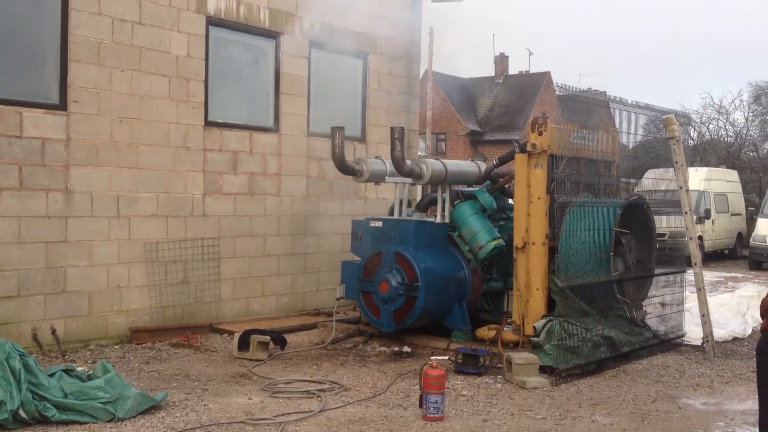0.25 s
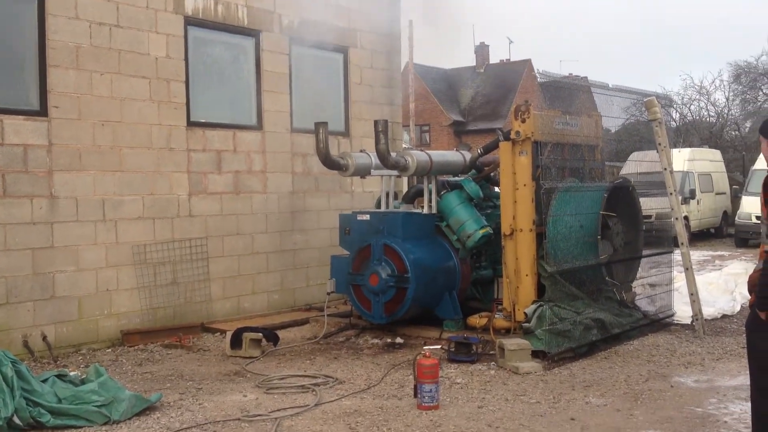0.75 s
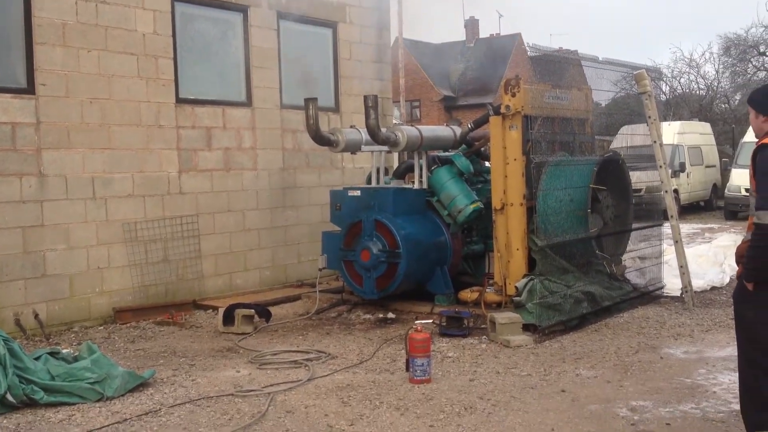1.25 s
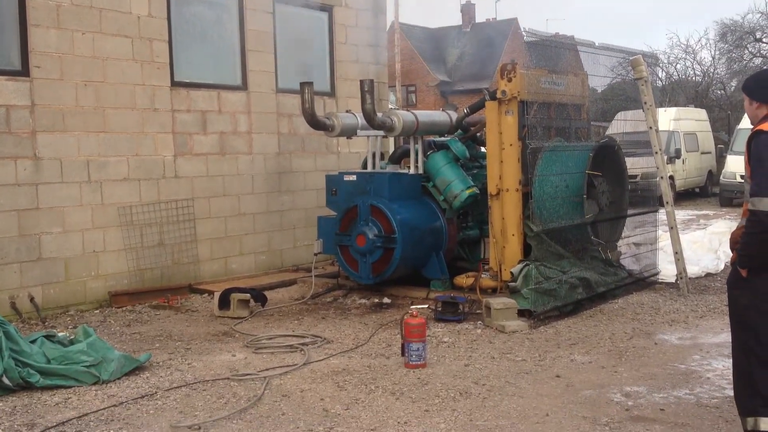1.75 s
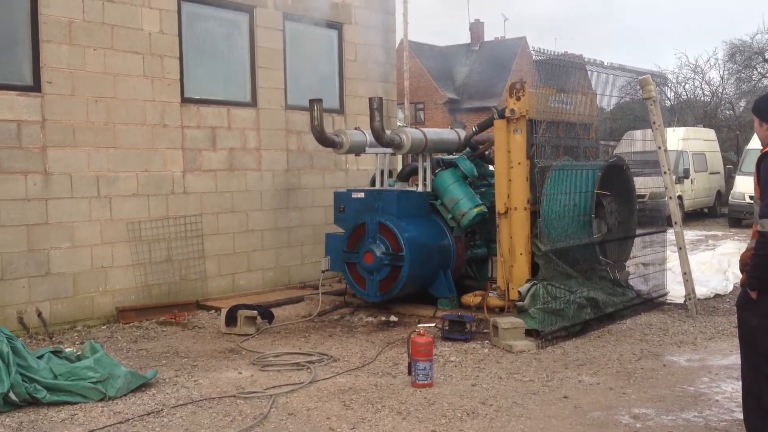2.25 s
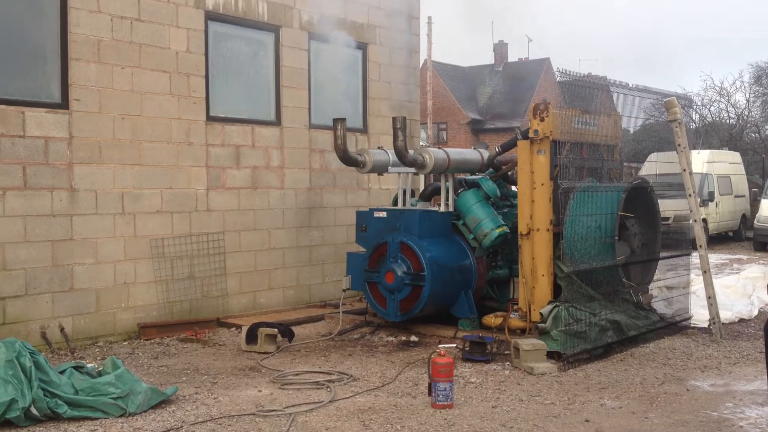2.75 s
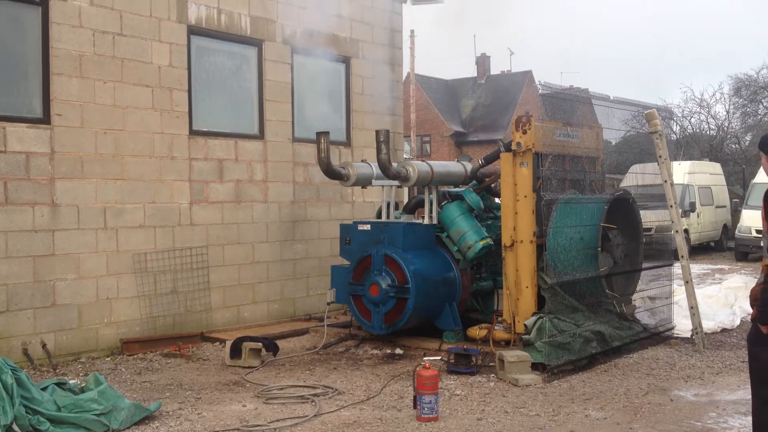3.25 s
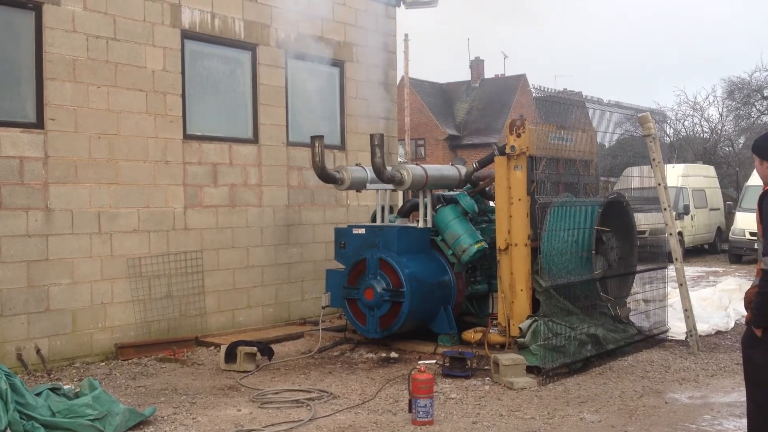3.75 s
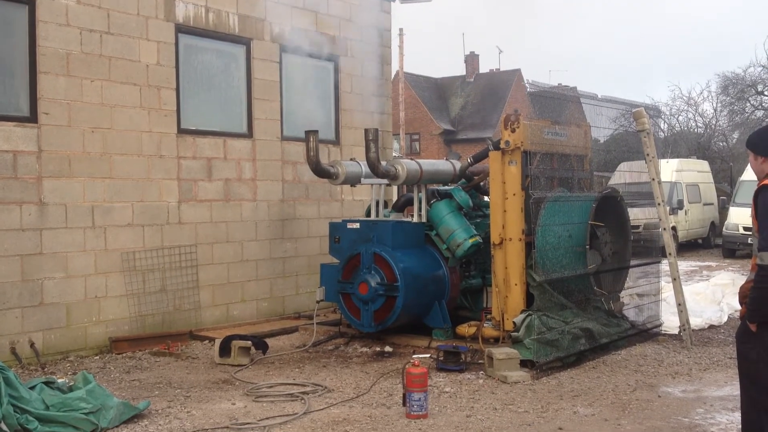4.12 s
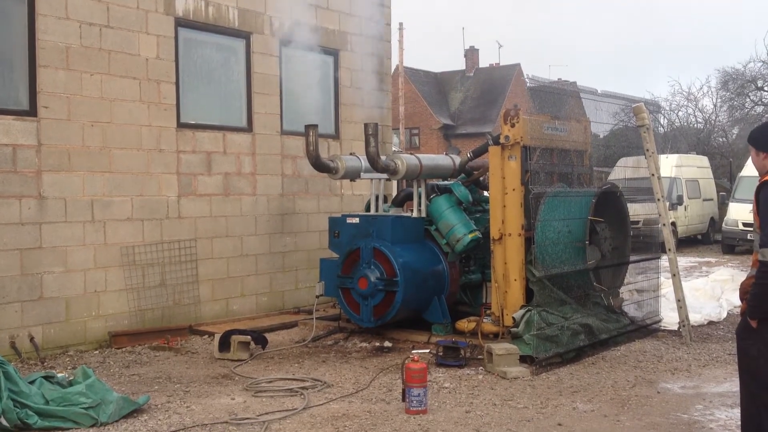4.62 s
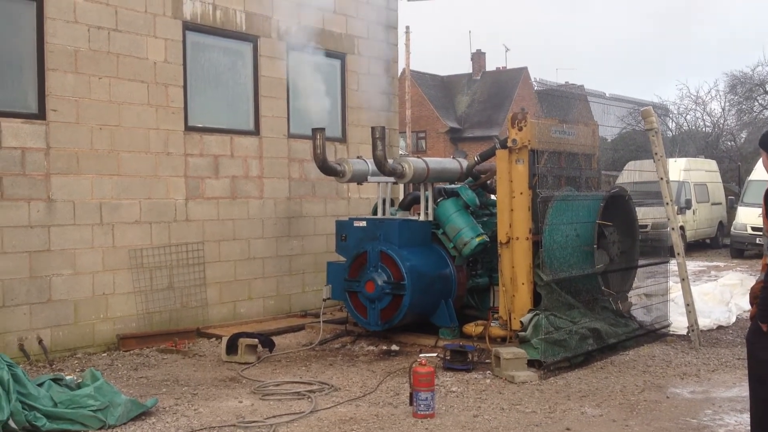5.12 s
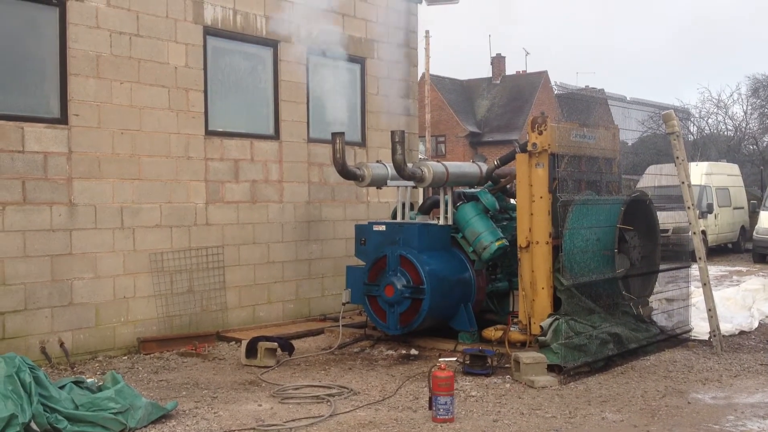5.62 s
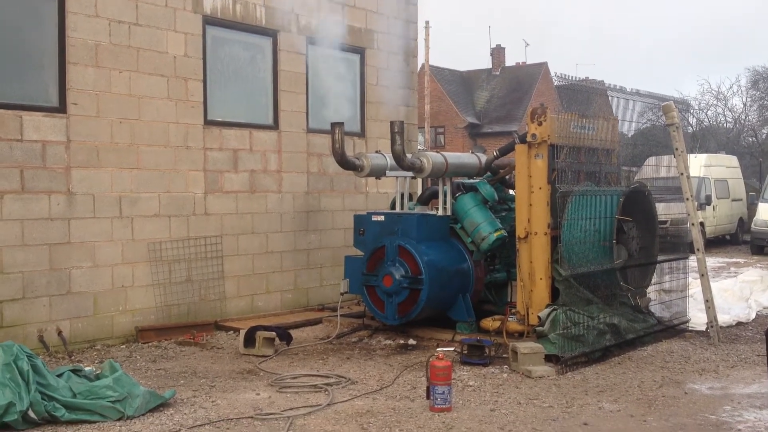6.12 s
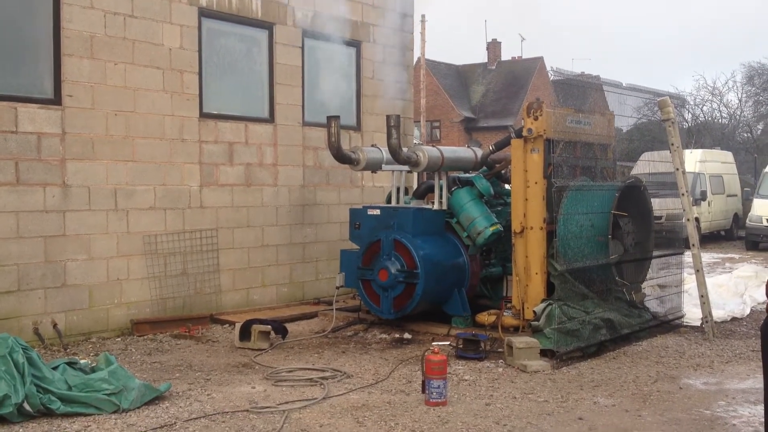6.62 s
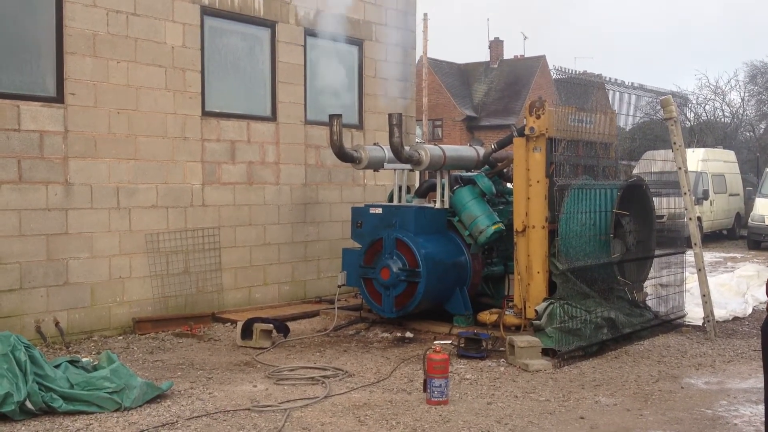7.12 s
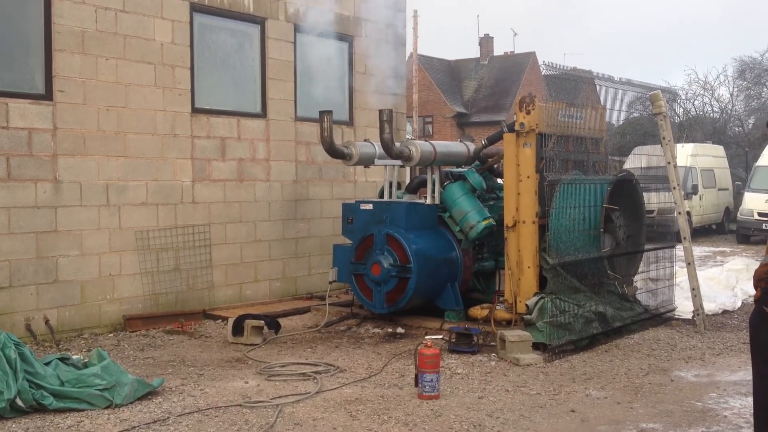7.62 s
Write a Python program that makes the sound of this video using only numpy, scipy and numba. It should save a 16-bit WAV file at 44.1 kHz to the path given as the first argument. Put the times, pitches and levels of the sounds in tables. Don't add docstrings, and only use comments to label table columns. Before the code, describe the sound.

A large diesel generator is already running rough in a yard beside a wall, recorded some metres away. Rapid, uneven exhaust puffs crackle and hiss, with a breathy whistle that climbs as the engine speeds up, then sinks again. Metallic clatter, dull block knocks and a wavering low drone continue beneath. Short echoes return from wall and ground, and the camcorder sound is bright, harsh and mid-heavy.

```python
import sys
import numpy as np
from scipy import signal
from scipy.fft import rfft, irfft
from scipy.io import wavfile
from scipy.ndimage import uniform_filter1d
from numba import njit

SR = 44100
rng = np.random.default_rng(int(sys.argv[2]) if len(sys.argv) > 2 else 0)


def waveform_to_disk(signal):
    frames = np.transpose(np.atleast_2d(signal))
    scaled = np.clip(frames, -1, 1) * 32767
    samples = np.round(scaled).astype(np.int16)
    wavfile.write(sys.argv[1], SR, samples)


def amplitude_ratio(level_db):
    exponent = np.asarray(level_db, float) / 20
    return 10 ** exponent


N = 347067

# time [s], clatter level [dB], rumble level [dB].
RUNNING = [(0.0, -18.5, -41), (0.44, -25.5, -40.5), (1.47, -22.5, -39.5), (2.5, -24.5, -40.5),
           (3.22, -22.5, -42), (4.2, -23.5, -41.5), (5.04, -22.5, -41.5), (5.37, -23.5, -41.5),
           (5.65, -20, -42), (6.84, -21, -42.5), (7.5, -23.5, -42.5), (7.87, -21.5, -35.5)]
# time [s], overtone spacing [Hz], whistle drive [dB].
SPEED_CURVE = [(0, 689, -0.5), (.25, 719.6, 5), (.6, 749.7, 11), (1.1, 772.7, 7.5), (1.5, 812.5, 6.5),
               (1.9, 857.5, 4.5), (2.4, 870, 0.5), (2.8, 884, -3), (4, 975, 0.5), (5.1, 926, -3.5),
               (5.55, 885, 3), (5.9, 845.4, 8), (6.2, 806, 8.5), (6.5, 767, 7), (7, 750.4, 8),
               (7.3, 753, 10), (7.55, 816, 5.5), (7.87, 849, -13)]


def level(x, db):
    return x * amplitude_ratio(db) / np.sqrt(np.mean(x ** 2))


def curves(table):
    s, *columns = np.transpose(table)
    return [np.interp(np.arange(N) / SR, s, c) for c in columns]


def colour(x, points):
    hz, db = np.transpose(points)
    size = 4096
    bin_hz = np.arange(size // 2 + 1) * SR / size
    gain_db = np.interp(np.log(bin_hz + 1), np.log(hz), db)
    cep = irfft(gain_db * np.log(10) / 20)
    cep[1:size // 2] *= 2
    cep[size // 2 + 1:] = 0
    return signal.fftconvolve(x, irfft(np.exp(rfft(cep))))[:N]


def butter(x, kind, hz):
    return signal.sosfilt(signal.butter(4, hz, kind, fs=SR, output="sos"), x)


@njit
def svf(x, hz, width):
    y, b, l = np.empty(len(x)), 0., 0.
    for i in range(len(x)):
        g, k = np.tan(np.pi * hz[i] / SR), width / hz[i]
        v = (b + g * (x[i] - l)) / (1 + g * (g + k))
        b, l, y[i] = 2 * v - b, l + 2 * g * v, k * v
    return y


def band(x, hz, width_hz):
    return svf(x, hz + np.zeros(N), float(width_hz))


def walk(rate_hz):
    k = int(SR / rate_hz)
    held = np.repeat(rng.standard_normal(N // k + 1), k)
    return 1.134 * uniform_filter1d(uniform_filter1d(held, k), k)[:N]


def grit(per_s, scatter_db, share):
    share = np.clip(share, 0, 1)
    size_db = scatter_db * np.minimum(rng.exponential(size=N), 7.5)
    clicks = (rng.random(N) < per_s / SR) * amplitude_ratio(size_db) * rng.choice([-1, 1], N)
    return np.sqrt(1 - share) * rng.standard_normal(N) + np.sqrt(share) * level(clicks, 0)


def block_rumble():
    # frequency [Hz], level [dB per Hz].
    bass = [(18, -81), (30, -76.5), (80, -15.5), (221, -2), (256, -2.5), (314, -12.5), (446, -21.5),
            (663, 0.5), (889, -7), (1000, -7), (1300, -31), (2200, -120)]
    rumble_db = curves(RUNNING)[1]
    rumble = level(colour(rng.standard_normal(N), bass), -35)
    deep = butter(rumble, "bandpass", [55, 400])
    block = butter(rumble, "highpass", 400)
    return deep * amplitude_ratio(rumble_db + 40.5) + block * amplitude_ratio(2.1 * walk(30) - 2.0)


def block_clatter():
    clatter_db = curves(RUNNING)[0]
    clatter = grit(per_s=900, scatter_db=2.0, share=0.13) * amplitude_ratio(0.48 * walk(14))
    tilt_hz_db = [(900, 3.0), (2500, 3.5), (6000, -4.0), (9000, -5.5), (11500, -0.5), (15000, -8.0)]
    return level(colour(clatter, tilt_hz_db), 0) * amplitude_ratio(clatter_db + 4)


def firing_knock(firing):
    centre_hz = 720 * (1 + 0.061 * walk(25))
    force = np.roll(firing, 400) * amplitude_ratio(4.1 * np.clip(walk(30), -3, 1.6))
    return level(band(rng.standard_normal(N), centre_hz, 105) * force, -40.5)


def short_rings():
    # start [s], peak level [dB], pitch [Hz].
    rings = [(0.173, -20, 677), (0.359, -23, 688), (0.57, -20.5, 675), (0.736, -20.5, 786),
             (0.865, -20, 731), (1.467, -23, 666.4), (1.523, -26, 668.6), (1.855, -22, 678),
             (2.294, -27.5, 676), (2.493, -20.5, 673), (2.716, -26, 730), (3.77, -23.5, 670),
             (4.657, -26, 663), (5.503, -26, 730), (5.872, -23, 670), (5.968, -23, 659), (6.214, -22.5, 670),
             (7.569, -26.5, 678.4), (7.744, -27, 673)]
    out, t = np.zeros(N), np.arange(int(.07 * SR)) / SR
    for s, db, hz in rings:
        envelope = (1 - np.exp(-t / 0.0063)) * np.exp(-t / .016)
        ring = envelope * np.sin(2 * np.pi * hz * t * (1.03 - 1.0 * t))
        at = int(s * SR)
        out[at:at + len(t)] += amplitude_ratio(db + 1.5) * ring[:N - at]
    return out


def pipes(firing):
    # start [s], end [s], pitch [Hz], level [dB].
    locked = [(0, 0.348, 190, -42), (0, .9, 212, -42), (.1, 0.898, 262, -43), (.85, 1.7, 239, -40.5),
              (.9, 1.2, 119, -47), (1.05, 1.45, 282, -43.5), (1.4, 1.649, 120.5, -48),
              (1.797, 2.6, 162, -44.5), (2.5, 3.4, 259, -46), (3.6, 5.302, 261, -46.5),
              (2.9, 5.3, 178, -51), (5.3, 7.87, 185, -49), (6.1, 7.4, 208, -48), (7.603, 7.87, 255, -53)]
    t = np.arange(N) / SR
    waver, throb = walk(14), walk(18)
    flow = uniform_filter1d(firing, 2600)

    def note(hz, db):
        shift = rng.integers(N)
        hz = hz * (1 + 0.02806 * np.roll(waver, shift))
        return amplitude_ratio(db + 3.1 * np.roll(throb, shift)) * np.sin(2 * np.pi * np.cumsum(hz) / SR)

    out = note(.28 * curves(SPEED_CURVE)[0], -46.5)
    for start, end, hz, db in locked:
        along = np.clip((t - start + .05) / (end - start + .1), 0, 1)
        out += note(hz, db + 4.5) * np.abs(np.sin(np.pi * along)) ** 0.43
    return out * (np.roll(flow, 1500) / flow.mean()) ** 0.54


def gates(drive_db):
    # start [s], level [dB], length [ms].
    under_way = (0.0025, -18.5, 19)
    catching = [(0.034, -20.5, 22), (0.064, -21.5, 35), (0.131, -19, 19.4), (0.19, -21, 38),
                (0.248, -21, 29), (0.268, -21.5, 48), (0.323, -19.5, 52), (0.397, -19.5, 44),
                (0.454, -20.5, 60), (0.534, -20.5, 32.0), (0.601, -22.0, 39.0), (0.652, -19.5, 40),
                (0.722, -17.5, 29.0), (0.784, -19.5, 32), (0.853, -18.5, 30), (0.914, -18.5, 39),
                (0.972, -17.5, 31), (1.04, -16.5, 28), (1.103, -18.5, 40.0), (1.151, -16, 27.3),
                (1.213, -19.5, 29.3), (1.275, -20, 36.4), (1.329, -17.5, 32.5)]
    limping = [(1.449, -19.5, 38), (1.504, -19, 34), (1.61, -19, 32.5), (1.664, -18.5, 41),
               (1.749, -22, 31.0), (1.796, -19.5, 31), (1.837, -16.5, 35), (1.948, -17.5, 35),
               (1.999, -17.0, 34), (2.08, -23.5, 25), (2.11, -19.5, 37.0), (2.159, -17.5, 37),
               (2.259, -18, 38), (2.315, -16, 33), (2.425, -15.0, 31), (2.477, -17.5, 39),
               (2.584, -17.5, 33), (2.634, -17.5, 34), (2.733, -19.5, 35), (2.79, -23.5, 23.5),
               (2.871, -20, 38.0), (2.929, -19.5, 25), (2.98, -19, 23.0), (3.03, -20.5, 32),
               (3.072, -17.5, 24.5)]
    racing = [(3.161, -20.5, 32), (3.218, -19.5, 35), (3.276, -23, 31), (3.32, -18, 34), (3.374, -21.5, 30),
              (3.51, -19.5, 33), (3.601, -18.0, 33.0), (3.748, -20, 31), (3.797, -20, 34),
              (3.873, -19.5, 48), (3.939, -18.5, 36), (4.045, -19.5, 33), (4.086, -21, 39),
              (4.175, -21.5, 39), (4.232, -16.5, 34.0), (4.324, -19, 33), (4.385, -20.5, 32),
              (4.446, -22.5, 53.0), (4.539, -20.5, 32), (4.575, -22.5, 35), (4.626, -24, 31),
              (4.717, -20.5, 32.0), (4.772, -19, 38)]
    pulling = [(4.857, -18.0, 41), (4.92, -20.5, 43), (4.969, -19, 40.0), (5.028, -21, 32), (5.07, -17, 31),
               (5.132, -21.0, 39), (5.171, -18.5, 24), (5.227, -21, 32.0), (5.268, -16.5, 34),
               (5.33, -21, 26.0), (5.379, -19.0, 30.0), (5.426, -17, 27), (5.479, -18.5, 24),
               (5.525, -16, 33), (5.585, -19, 27), (5.631, -16.0, 24), (5.684, -17, 29), (5.731, -18, 27.7),
               (5.783, -19, 33.4), (5.835, -16.5, 31), (5.895, -16, 25.5), (5.956, -20, 34),
               (6.011, -18.5, 31), (6.068, -18.5, 28), (6.121, -18, 28), (6.175, -17.5, 23.0),
               (6.219, -22.5, 39), (6.243, -16.5, 20.4), (6.299, -18, 28.3)]
    sagging = [(6.35, -18.5, 31.0), (6.387, -23, 17.7), (6.421, -17.5, 28), (6.473, -20, 52),
               (6.54, -16, 24.0), (6.607, -20.0, 25.0), (6.655, -19, 44.0), (6.72, -19.0, 43),
               (6.791, -20.5, 35.0), (6.839, -19.5, 46), (6.903, -18.0, 32), (6.945, -19, 19),
               (6.987, -20, 27), (7.038, -20.5, 46), (7.101, -20.5, 40.5), (7.175, -20.5, 29.4),
               (7.229, -21.5, 37.6), (7.293, -18, 29.0), (7.371, -18.5, 35), (7.442, -21, 26.3),
               (7.48, -17, 44.0), (7.654, -20.5, 41), (7.816, -31, 37.0)]
    puffs = [under_way, *catching, *limping, *racing, *pulling, *sagging]
    treble, middle = np.zeros(N), np.zeros(N)
    t_ms = np.arange(int(.15 * SR)) / SR * 1000
    swell_share, hold_share = .13, 0.37
    for s, db, length_ms in puffs:
        swell = 1 - np.exp(-(t_ms / (swell_share * length_ms)) ** 1.38)
        fade = np.clip((t_ms / length_ms - hold_share) / (1.41 * (1 - hold_share)), 0, None)
        at = max(int((s - .002) * SR), 0)
        power = (swell * np.exp(-fade ** 2.15))[:N - at] ** 2
        middle_db = 0.1 - 0.1998 * drive_db[at] - 0.35 * (db + 19) + 0.85 * rng.standard_normal()
        treble[at:at + len(power)] += power * amplitude_ratio(2 * db)
        middle[at:at + len(power)] += power * amplitude_ratio(2 * (db + middle_db))
    return np.sqrt(treble), np.sqrt(middle)


def stack_whistle(spacing_hz, drive_db, middle):
    dead = np.exp(-((2 * spacing_hz - 1608) / 51) ** 2)
    live = np.exp(-((2 * spacing_hz - 1790) / 60) ** 2) * (np.gradient(spacing_hz) < 0)
    second_db = 11.5 + 0.42 * drive_db - 5 * dead + 4 * live
    spacing_hz = spacing_hz * (1 + 0.013 * walk(70) + 0.01203 * (middle / middle.mean() - 1))
    blow = rng.standard_normal(N) * (middle + 0.12 * uniform_filter1d(middle, 6000))

    def overtone(order, width_hz):
        hz = order * spacing_hz
        return band(band(blow, hz, width_hz), hz, 2 * width_hz)

    whistle = amplitude_ratio(second_db) * overtone(2, 82)
    whistle += amplitude_ratio(drive_db + 7) * overtone(3, 187)
    whistle += amplitude_ratio(drive_db + 3.5) * overtone(4, 107.0)
    note = np.sin(6 * np.pi * np.cumsum(spacing_hz) / SR)
    return whistle + amplitude_ratio(drive_db - 12.0 + 1.5 * walk(60)) * uniform_filter1d(middle, 120) * note


def exhaust():
    spacing_hz, drive_db = curves(SPEED_CURVE)
    treble, middle = gates(drive_db)
    flutter = amplitude_ratio(1.3 * walk(220))
    gas = grit(per_s=1500, scatter_db=3.0, share=0.24) * flutter
    hiss = amplitude_ratio(-1.0) * butter(gas, "highpass", 3920) * treble
    roar = amplitude_ratio(1.5) * butter(gas, "bandpass", [950, 3500]) * middle
    return hiss + roar + stack_whistle(spacing_hz, drive_db, middle), middle


def yard_echoes(blast):
    # delay [ms], level [dB].
    surfaces = [
        (11.3, -10),
        (17, -10.5),
        (27, -16),
        (41, -16.5),
    ]
    return sum(amplitude_ratio(db) * np.roll(blast, int(ms * SR / 1000)) for ms, db in surfaces)


def microphone(x):
    # frequency [Hz], level [dB per Hz].
    housing = [(530, -39), (900, -17.5), (1150, -8), (1450, -8), (1800, -10.5), (2400, -4.5), (3000, -13),
               (4100, -12.5), (4600, -5.5), (6200, -1), (7200, -7), (9000, -17), (9990, -36.5),
               (11000, -32.5), (14400, -28)]
    return colour(x, housing)


def puff_ring(blast):
    # frequency [Hz], width [Hz], level [dB].
    modes = [(1052, 61.4, 3), (1374, 87, -8), (2540, 240, -9), (3340, 93.7, -8), (4739, 144, 1.5),
             (5380, 140, -10), (6114, 190, -6), (6400, 190, -5)]
    # time [s], upper ring level [dB].
    aim = [
        (0, 3),
        (.8, 2.5),
        (1.2, 4.5),
        (2.5, 3.5),
        (3.6, -4),
        (5.1, -5),
        (6.3, 4.5),
        (7, 1.5),
        (7.87, -6),
    ]
    aim_db, = curves(aim)
    struck = microphone(amplitude_ratio(4.5) * blast)
    out = np.zeros(N)
    for hz, width_hz, db in modes:
        tilt = np.clip((hz - 5450) / 700, -1, 1) * (hz > 4000)
        out += amplitude_ratio(db + 4.3 * walk(18) + aim_db * tilt) * band(struck, hz, width_hz)
    return out


def block_ring(x):
    # frequency [Hz], width [Hz], level [dB].
    modes = [(680, 180, -11), (1062, 71, -5.5), (1366, 92, -7.5), (4870, 170, -12), (5680, 200, -9),
             (6284, 503, -3)]
    return sum(amplitude_ratio(db) * band(x, hz, width_hz) for hz, width_hz, db in modes)


def scene():
    blast, firing = exhaust()
    bright = amplitude_ratio(7.5) * (blast + amplitude_ratio(-5) * yard_echoes(blast)) + block_clatter()
    dry = microphone(bright) + block_rumble() + firing_knock(firing)
    dry = dry + puff_ring(blast)
    dry = dry + block_ring(dry)
    return (dry + pipes(firing) + short_rings())[None, :]


def roll_off(x):
    return signal.sosfilt(signal.butter(12, 15670, fs=SR, output="sos"), x)


def record(dry):
    rounded = np.tanh(1.1 * dry) / 1.1
    top_cut = signal.ellip(8, .2, 60, 15400, fs=SR, output="sos")
    low_cut = signal.butter(2, 45, "highpass", fs=SR, output="sos")
    return roll_off(signal.sosfilt(np.vstack([top_cut, low_cut]), rounded))


dry = scene()
out = record(dry)
waveform_to_disk(out)
```